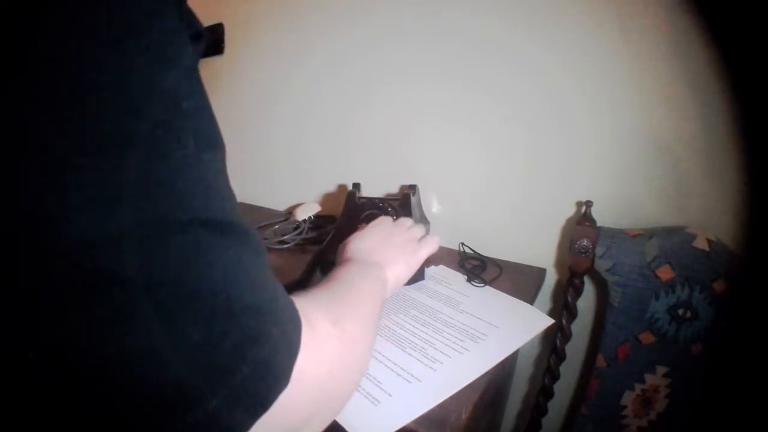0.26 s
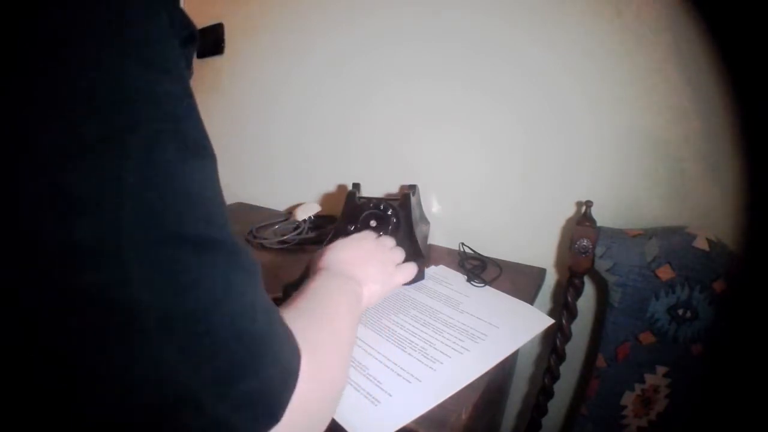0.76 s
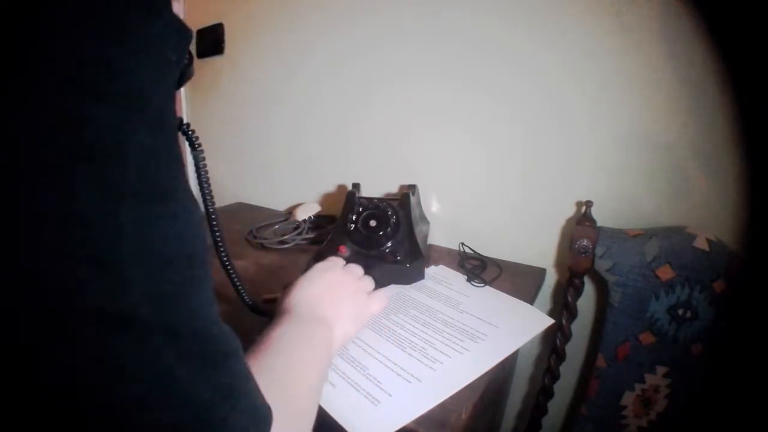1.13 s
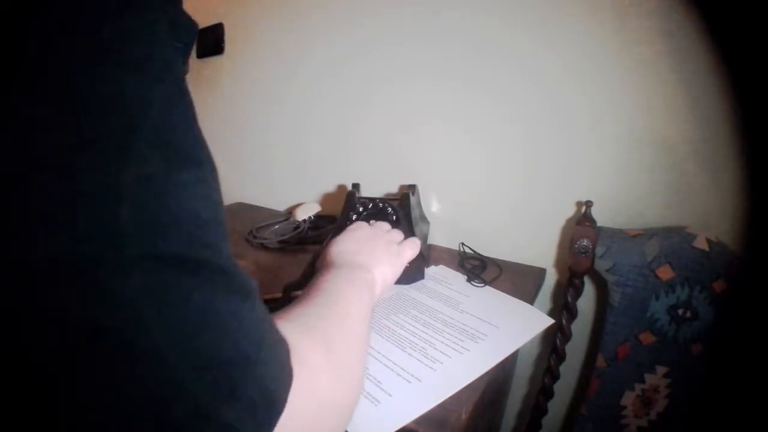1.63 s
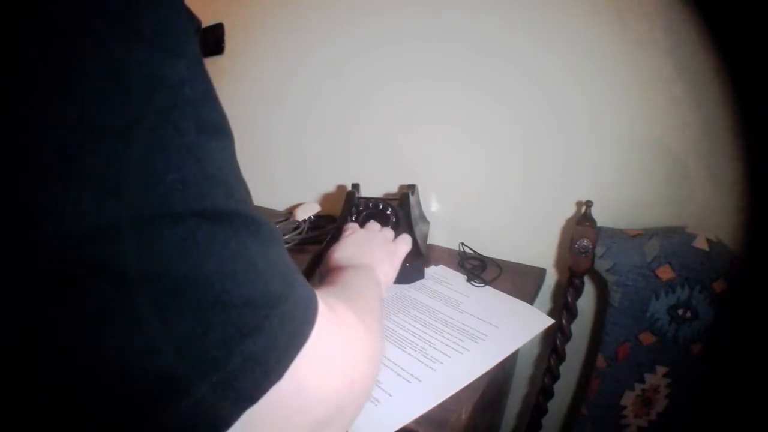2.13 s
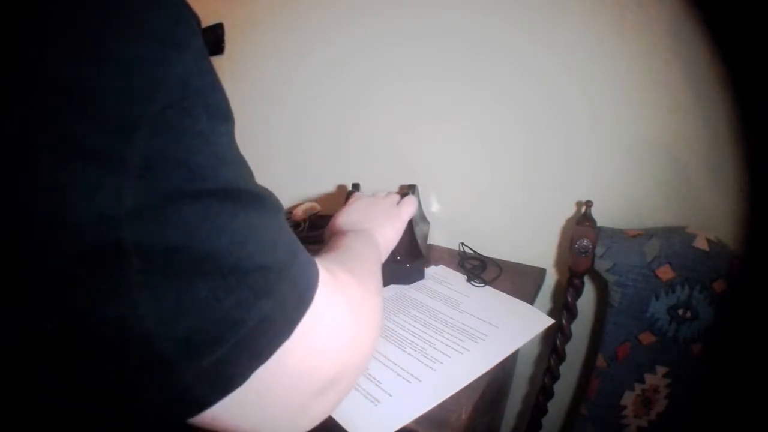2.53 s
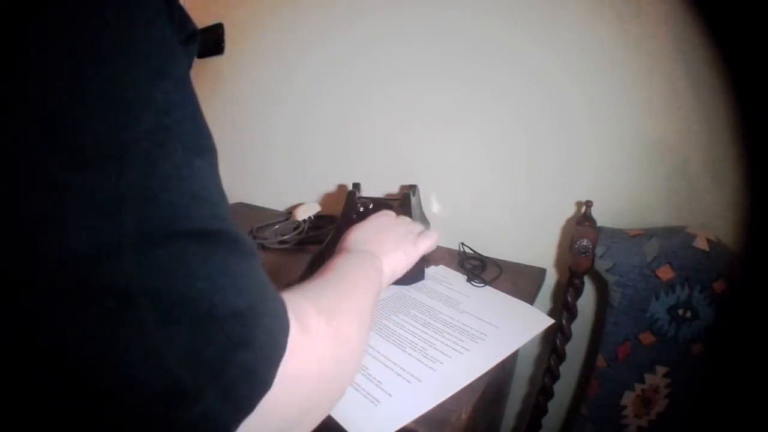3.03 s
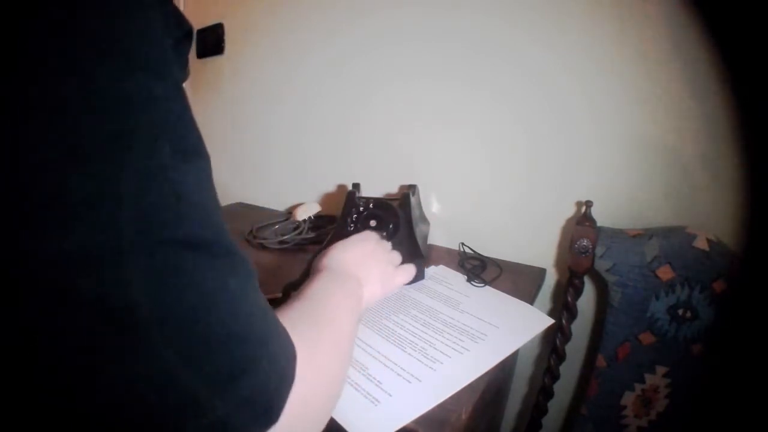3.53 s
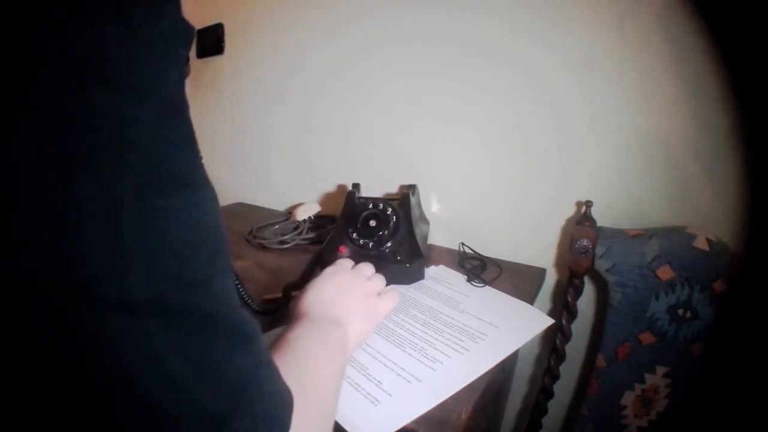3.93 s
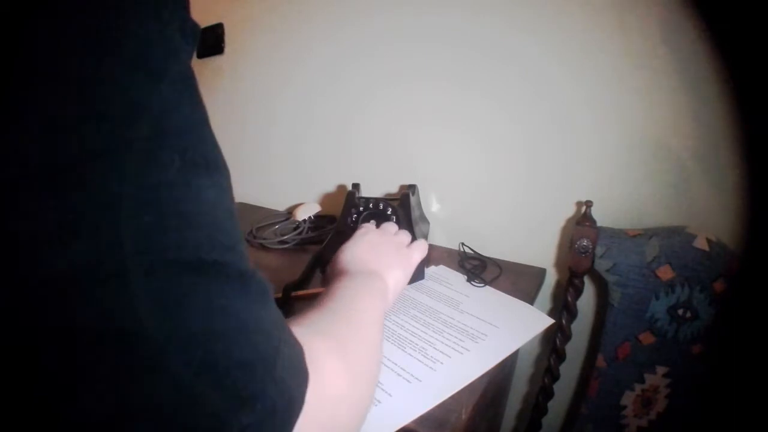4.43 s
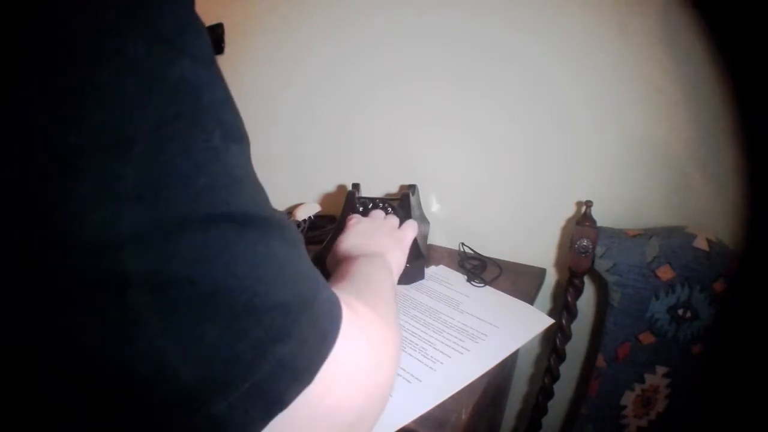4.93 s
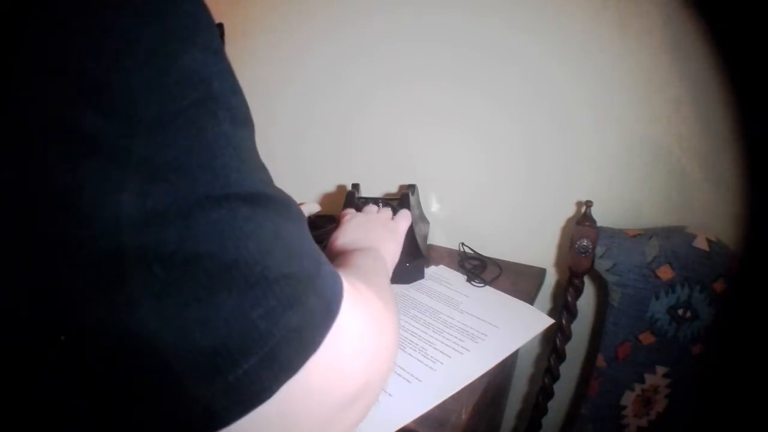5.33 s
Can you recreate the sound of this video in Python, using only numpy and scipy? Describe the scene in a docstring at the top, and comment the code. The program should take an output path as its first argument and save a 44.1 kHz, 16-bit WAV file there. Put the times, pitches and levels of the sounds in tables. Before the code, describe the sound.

Plastic dial rattles as a finger turns it, then spins back in a buzzing, clicking run to a firm stop; a second, longer turn follows.

```python
"""Rotary telephone dial

A finger winds the dial in a quiet room, and twice it spins back: 7 contact pulses, then 11.
Gear teeth whirr as dense impacts in a resonant plastic shell; the governor taps in gear with the pulses;
dial knocks, pawl, loose gears and stops strike the shell as bursts of tiny impacts, with dull thuds below.
Random reflections make the room, shaped noise the faint hiss of room and microphone."""
import sys
import numpy as np
from scipy import signal
from scipy.fft import rfft, irfft
from scipy.io import wavfile
from scipy.ndimage import uniform_filter1d

SR = 44100
rng = np.random.default_rng(int(sys.argv[2]) if len(sys.argv) > 2 else 0)


def put_to_file(sound):
    """Save the sound as 16-bit audio at rate SR, in the file named by the first command-line argument."""
    columns = np.atleast_2d(sound).T  # one column per channel
    safe = np.clip(columns, -1, 1)
    whole_steps = np.round(safe * 32767)
    wavfile.write(sys.argv[1], SR, whole_steps.astype(np.int16))


def voltage_ratio(decibels):
    """Convert decibels (scalar or array-like) to amplitude ratios, 20 dB per decade."""
    exponent = np.asarray(decibels, float) / 20
    return 10 ** exponent


N = 246078
TAPS = 2048  # length of a body response
HZ = np.fft.rfftfreq(2 * TAPS, 1 / SR)
STOP_AFTER_S = .048  # last pulse to rest stop
KNOCK_BURST = 6.4  # burst length, units of 1.1 ms

# Modes of the plastic shell. Each row: centre in Hz, width in Hz, relative level in dB.
SHELL = [(609, 52, -15.5), (1188, 150, -5.5), (1601, 142, -0.5), (2040, 330, -4), (2890, 65, -8),
         (3280, 56, -18), (4350, 450, -16.0), (822, 93, -14.5), (1044, 46, -3.0), (2235, 56, -9.5),
         (2436, 330, -6.0), (3066, 340, -10), (4725, 420, -16.5)]
# Small spring, contact or pawl. Each row: centre in Hz, width in Hz, relative level in dB.
SPRING = [(4500, 1100, -3.5), (6340, 760, -7), (7500, 1930, -3.5), (8250, 340, -8), (11880, 350, -10.5),
          (13400, 3800, -21)]
# Dial spinning back. Each row: let-go in seconds, let-go knock in dB, clack at first pulse in dB,
# last pulse in seconds.
RETURNS = [(0.798, -27, -20.5, 1.484), (3.538, -31, -28, 4.6353)]


def evened(x):
    """Scales to rms 1."""
    return x / np.sqrt(np.mean(x ** 2) + 1e-20)


def read(points, hz):
    """Reads a spectrum on a log-frequency axis."""
    f, value = np.transpose(points)
    return np.interp(np.log(hz + 1), np.log(f + 1), value)


def add(mix, s, sound):
    """Mixes a sound in at time s."""
    part = mix[round(s * SR):][:len(sound)]
    part += sound[:len(part)]


def ring(modes, broad_db, tilt_db=0., spread_db=0.):
    """Minimum-phase response of a body: unevenly excited modes over broad radiation, tilted in dB per octave."""
    # Radiation between the modes. Each row: frequency in Hz, relative level in dB.
    shell_broad = [(71, -64), (120, -43), (272, -19.5), (580, -12), (741, -16), (1190, 0.5), (1450, 0),
                   (1610, -2.5), (1780, 0.5), (2060, -3.5), (3880, -12.5), (4670, -15.5), (5500, -22),
                   (7620, -28), (11000, -38), (15900, -43.5)]
    hz, width_hz, db = np.transpose(modes)[:, :, None]
    db = db + spread_db * rng.standard_normal(db.shape)
    power = (voltage_ratio(2 * db) / (1 + (2 * (HZ - hz) / width_hz) ** 2) ** 2).sum(0)
    power = power + voltage_ratio(2 * (read(shell_broad, HZ) + broad_db))
    octaves = np.log2(np.maximum(HZ, 600) / 1600)
    log_gain = .5 * np.log(power + 1e-12) + np.log(voltage_ratio(tilt_db * octaves))
    cepstrum = irfft(log_gain)
    cepstrum[1:TAPS] *= 2  # folded cepstrum: causal
    cepstrum[TAPS + 1:] = 0
    return irfft(np.exp(rfft(cepstrum)))[:TAPS]


def struck(db, burst, modes, broad_db, tilt_db, spread_db):
    """A burst of tiny impacts rings the body; the room, hearing all sides, gets the even colour."""
    t = np.arange(600) / SR / (0.0011 * burst)
    size, chance = rng.standard_normal((2, len(t)))
    hits = size * (chance > .4) * (1.12 + 0.85 * t) * np.exp(-t ** 2)
    hits[0] = 1.7  # firm first contact
    sound = np.convolve(hits, ring(modes, broad_db, tilt_db, spread_db))
    sound = voltage_ratio(db) * sound / abs(sound).max()
    even = ring(modes, broad_db, tilt_db)
    return sound, even * np.linalg.norm(sound) / np.linalg.norm(even)


def shell_blow(s, peak_db, tilt_db, burst):
    """A blow on the shell: time, then the arguments of struck()."""
    return s, peak_db, burst, SHELL, -4.5, tilt_db, 2.5


def spring_tick(s, peak_db):
    """A brief bright tick of a small spring, contact or pawl: time, then the arguments of struck()."""
    return s, peak_db, 3.5, SPRING, -14., 0, 1.5


def winding():
    """Gear train driven by the finger: gain and brightness."""
    # One curve a stroke. Each row: time in seconds, relative whirr level in dB, brightness (-4 dull, 4 bright).
    strokes = [
        [(0.0, -45, 0.8), (0.248, -47, -2.5), (0.42, -59, 7)],
        [(2.06, -53, -3), (2.12, -55.5, 3.5), (2.22, -54.5, 2.5)],
        [(2.27, -45, -1.5), (2.45, -47.5, -2), (2.55, -47.5, 0.5), (2.72, -46, 0), (2.9, -48.5, -2),
         (2.96, -47.5, 0.5), (3.194, -47, -1), (3.238, -56.5, 1), (3.33, -44.5, -1)],
        [(5.23, -59, 3.5), (5.392, -55, -1), (5.44, -58, 2)],
        [(5.48, -54, 3), (5.58, -45, 3.5)],
    ]
    t, level, bright = np.arange(N) / SR, np.zeros(N), np.zeros(N)
    for rows in strokes:
        s, db, stroke_bright = np.transpose(rows)
        level += voltage_ratio(np.interp(t, s, db, -200, -200))
        bright += np.interp(t, s, stroke_bright, 0, 0)
    return level, bright


def drive():
    """Gear train driven by finger and spring; a return surges as the spring takes hold."""
    return_db, return_bright = -45, 0.6
    surge_db, surge_s, coast_s = 3.5, 0.093, 0.0375
    t = np.arange(N) / SR
    level, bright = winding()
    for start, *_, last in RETURNS:
        running = (t > start) & (t < last + STOP_AFTER_S + coast_s)
        level += running * voltage_ratio(return_db + surge_db * np.exp(-((t - start) / surge_s) ** 2))
        bright += running * return_bright
    return level, bright


def pulse_times():
    """Contact pulses of each return: gaps longer at spin-up and as the spring runs down."""
    gap_s, spin_up_s, run_down_s, run_down_pulses = .1018, .0068, .0045, 2.5
    # Pulses in each return.
    pulse_counts = [7, 11]
    for count, row in zip(pulse_counts, RETURNS):
        gaps = gap_s + run_down_s * np.exp(-np.arange(count - 1) / run_down_pulses)  # from the last back
        gaps[-1] += spin_up_s
        yield row[-1] - np.append(0, np.cumsum(gaps))[::-1]


def governor_turns():
    """Governor angle in beats, geared to the pulse contact; zero outside the returns."""
    beats_per_pulse = 3.474
    # Time of one beat in each return, in seconds.
    beat_at = [1.2428, 4.3196]
    t, turns = np.arange(N) / SR, np.zeros(N)
    for s, beat_s in zip(pulse_times(), beat_at):
        s = np.append(s, 2 * s[-1] - s[-2])  # runs on past the last pulse
        count = np.arange(len(s))
        pulse = np.interp(t, s, count) - np.interp(beat_s, s, count)
        running = (t > s[0]) & (t < (s[-1] + s[-2]) / 2)
        turns[running] = beats_per_pulse * pulse[running]
    return turns


def wander(n):
    """Slow random drift of rms 1, smoothed twice over n samples."""
    return evened(uniform_filter1d(uniform_filter1d(rng.standard_normal(N), n), n))


def whirr(turns):
    """Dense tooth impacts of uneven size, bunched once per governor beat, ring the shell."""
    level, bright = drive()
    teeth_per_s = 7000
    size = voltage_ratio(2.96 * np.minimum(rng.exponential(1, N), 3)) * (rng.random(N) < teeth_per_s / SR)
    lumps_db = np.where(turns != 0, 1.2, 3.1) * wander(250)  # finger drives less evenly than spring
    bunch = 1 + 0.089 * np.cos(2 * np.pi * (turns - .1)) * (turns != 0)
    teeth = evened(size * rng.choice([-1, 1], N) * voltage_ratio(lumps_db) * bunch)
    teeth = teeth * uniform_filter1d(level, 100)
    share = np.clip(.5 + bright / 8, 0, 1)  # blend of a dull and a bright contact
    spots = voltage_ratio(15.8 * np.array([wander(900) for _ in range(3)]))  # contact wanders over three spots
    octaves = np.log2(np.maximum(HZ, 400) / 1600)
    out = np.zeros(N)
    for spot in spots / np.linalg.norm(spots, axis=0):
        plain = ring(SHELL, 0.5, 0, spread_db=6.0)
        for part, sign in ((1 - share, -1), (share, 1)):
            body = irfft(rfft(plain, 2 * TAPS) * voltage_ratio(4.64 * sign * octaves))
            body = np.roll(body, 64)[:TAPS] / np.linalg.norm(plain)  # keeps the filter's lead-in
            out += signal.oaconvolve(teeth * spot * part, body)[64:N + 64]
    return voltage_ratio(-5.5) * out


def loose_gears():
    """Loose gears rattle at random while the finger winds."""
    rate_per_s, above_drive_db, spread_db, tilt_db = 22, 5, 2.5, -4.5
    wound, _ = winding()
    size, colour = rng.standard_normal((2, N))
    hit = (rng.random(N) < rate_per_s / SR) & (wound > 1e-4)
    for at in np.flatnonzero(hit):
        peak_db = 20 * np.log10(wound[at]) + above_drive_db + spread_db * size[at]
        yield shell_blow(at / SR, peak_db, tilt_db + 2.5 * colour[at], KNOCK_BURST)


def hiss():
    """Steady noise of room and microphone."""
    # Each row: frequency in Hz, relative density in dB per Hz.
    colour = [(18, -44), (30, -9.5), (90, -12.5), (141, -11.5), (240, -8), (738, -3.5), (1300, -2.5),
              (2200, -6), (3200, -10.5), (5290, -16), (9000, -14), (15900, -16)]
    z = rfft(rng.standard_normal(N)) * voltage_ratio(read(colour, np.fft.rfftfreq(N, 1 / SR)))
    return voltage_ratio(-68) * evened(irfft(z, N))


def dial_knocks():
    """Separate knocks, clacks and small ticks of the dial, ringing the shell."""
    # Each row: time in seconds, peak in dB, brightness in dB per octave.
    knocks = [(0.017, -36, -7.5), (0.047, -34.5, -5), (0.152, -31.5, 2), (0.174, -33.5, -3.5),
              (0.283, -39.5, 5), (0.322, -35.5, -3.5), (0.353, -36.5, -4.5), (0.381, -36, 2),
              (0.505, -51, -2), (1.794, -52.5, -8.5), (2.06, -36.5, 4.3), (2.129, -34, 5.5),
              (2.269, -33.5, -3), (2.287, -27, -0.1), (2.321, -33, -3), (3.267, -25, -1), (3.295, -38.5, 7),
              (3.346, -42.5, 2), (3.437, -42.5, 2), (3.55, -29.5, -1.3), (4.945, -50.5, -5),
              (5.198, -49, -2.5), (5.254, -34.5, 4.5), (5.346, -39, 7), (5.388, -44.5, 8), (5.478, -31, -2),
              (5.497, -27.5, 0), (5.505, -28, 2.5), (5.531, -32.5, -0.7), (5.574, -28.5, 2.5)]
    return [shell_blow(*row, KNOCK_BURST) for row in knocks]


def thud_rows():
    """Thuds of hand and base on the table, then of each let-go, stop and rock of the base."""
    # Each row: time in seconds, level in dB, centre in Hz.
    hand = [(.044, -44, 352), (.12, -41, 557), (.329, -50.5, 430), (1.934, -55.5, 442), (2.117, -39, 367),
            (2.14, -46, 135), (2.16, -43, 850), (2.27, -51, 700), (2.665, -40.5, 357), (2.69, -53, 130),
            (2.709, -40.5, 460), (3.289, -42, 510), (5.235, -42, 380), (5.267, -46, 169), (5.35, -50, 340),
            (5.476, -47, 325)]
    rock_after_s = .028
    # appended: T60 in s, ring of the base 0-1
    rows = [(*row, .13, 0.074) for row in hand]
    for start, *_, last in RETURNS:
        stop = last + STOP_AFTER_S
        rows += [(start, -48.5, 580, 0.2, 0),
                 (stop, -33, 760, 0.13, 0),
                 (stop + rock_after_s, -44, 452, .17, 0.6)]
    return rows


def thuds():
    """Soft low pushes: a puff of dull noise, some also ringing the base plate."""
    base_hz, rise_s = 231.6, 0.013  # lowest note of the base plate
    t, out = np.arange(6000) / SR, np.zeros(N)
    for s, db, hz, t60_s, base in thud_rows():
        band = signal.butter(2, [0.64 * hz, 1.62 * hz], "band", fs=SR)
        puff = signal.lfilter(*band, rng.standard_normal(len(t)))
        # microphone picks up little deep bass
        puff = signal.lfilter(*signal.butter(2, 105, "high", fs=SR), puff)
        shape = (1 - np.exp(-t / rise_s)) * voltage_ratio(-60 * t / t60_s)
        add(out, s, voltage_ratio(db) * shape * (0.6 * evened(puff) + base * np.sin(2 * np.pi * base_hz * t)))
    return out


def pawl():
    """Pawl dropping over ratchet teeth: its spring ticks, the shell clacks after."""
    # Each row: time in seconds, clack peak in dB.
    drops = [(0.112, -25), (0.2587, -50), (2.1847, -50), (2.5042, -33), (2.597, -31), (2.7035, -27),
             (2.808, -37), (2.9276, -33), (3.024, -34), (3.1252, -36.5), (3.225, -34.5)]
    clack_after_s = .008
    for s, clack_db in drops:
        yield spring_tick(s, -47.5)
        yield shell_blow(s + clack_after_s, clack_db, 2, 6.4)


def return_blows():
    """Let-go, first-pulse clack, rest stop with bounces of falling level, late settling tick."""
    bounce_count, bounce_gap_s, bounce_db, bounce_loss_db = 5, .0195, -33, 2
    settle_after_s = .2155
    for (start, go_db, first_db, last), pulses in zip(RETURNS, pulse_times()):
        stop = last + STOP_AFTER_S
        yield shell_blow(start, go_db, .6, 13.5)
        yield shell_blow(pulses[0], first_db, 3.5, 4.7)
        yield shell_blow(stop, -24, -1.3, 8.5)
        for k in range(bounce_count):
            yield shell_blow(stop + (k + 1) * bounce_gap_s, bounce_db - k * bounce_loss_db, -3.5, KNOCK_BURST)
        yield shell_blow(stop + settle_after_s, -40.5, 4.1, KNOCK_BURST)


def contact_pulses():
    """The contact spring ticks at each pulse."""
    return [spring_tick(s, -39.5 + 2.2 * rng.standard_normal()) for s in np.concatenate(list(pulse_times()))]


def governor_taps(turns):
    """One tap a governor beat, ringing base plate and shell."""
    # Each row: centre in Hz, width in Hz, relative level in dB.
    modes = [(234, 12.5, -18.5), (278, 5, -15.5), (1620, 260, -5.5), (2035, 134, -8)]
    return [(at / SR, -35 + 2.2 * rng.standard_normal(), 1.8, modes, -24., 0, 1.5)
            for at in np.flatnonzero(np.diff(np.floor(turns)) == 1)]


def impacts(turns):
    """All separate strikes: rows to the microphone and to the room."""
    strikes = [*loose_gears(), *dial_knocks(), *pawl(), *return_blows(), *contact_pulses(),
               *governor_taps(turns)]
    direct, diffuse = np.zeros((2, N))
    for s, *how in strikes:
        sound, even = struck(*how)
        add(direct, s, sound)
        add(diffuse, s, even)
    return direct, diffuse


def room(x):
    """Sparse reflections of random sign, each band dying at its own speed."""
    # Each row: frequency in Hz, T60 in seconds.
    decay = [(200, 0.33), (530, 0.53), (1390, 0.29), (3680, 0.33), (9700, 0.5)]
    taps = np.zeros(SR // 2)
    at = np.arange(200, len(taps) - 20, 20)
    taps[at + rng.integers(0, 20, len(at))] = rng.choice([-1., 1.], len(at))
    hz, t, z = signal.stft(taps, SR, nperseg=256)
    fade = voltage_ratio(-60 * t / read(decay, hz)[:, None])
    tail = signal.istft(z * fade, SR, nperseg=256)[1]
    return signal.fftconvolve(x, tail / np.linalg.norm(tail))[:N]


def scene():
    """The telephone, its room and the noise floor."""
    turns = governor_turns()
    direct, diffuse = impacts(turns)
    steady = whirr(turns) + thuds()
    return (steady + direct + voltage_ratio(-3) * room(steady + diffuse) + hiss())[None]


def top_cut(x):
    """Nothing passes above the cut-off."""
    return signal.sosfilt(signal.butter(12, 16070, fs=SR, output="sos"), x)


def record(dry):
    """Adds the constant offset of the converter."""
    offset = -.0005
    return top_cut(dry + offset)


dry = scene()
out = record(dry)
put_to_file(out)
```